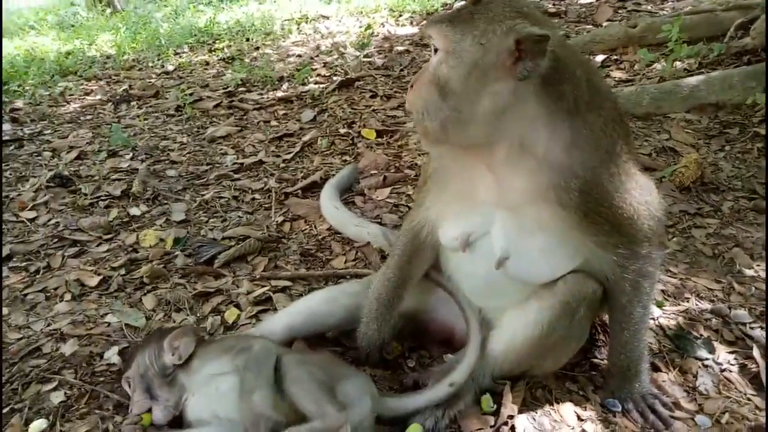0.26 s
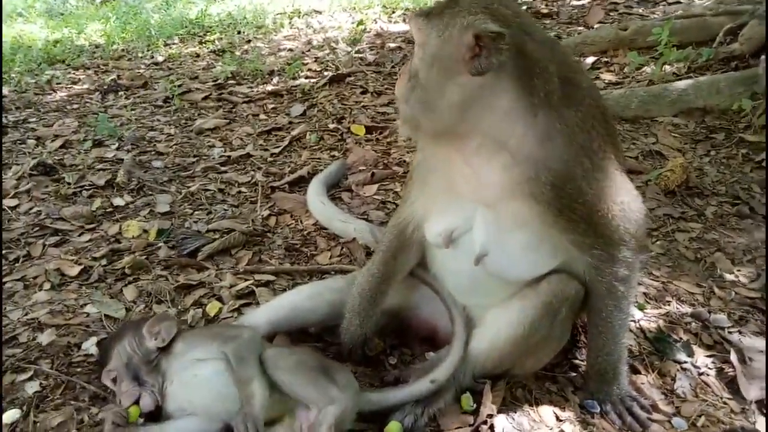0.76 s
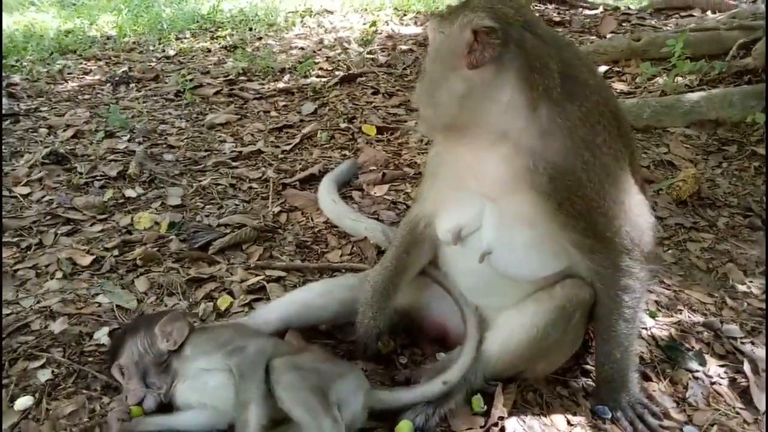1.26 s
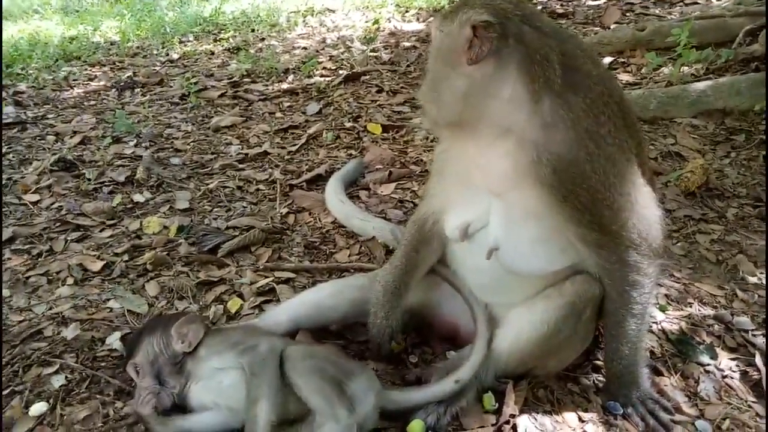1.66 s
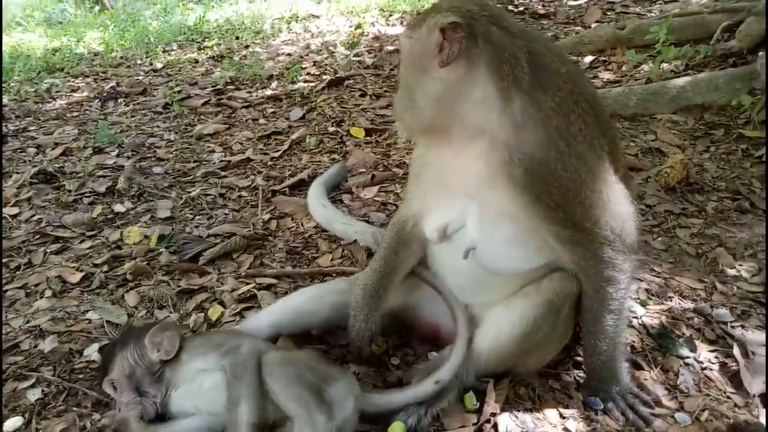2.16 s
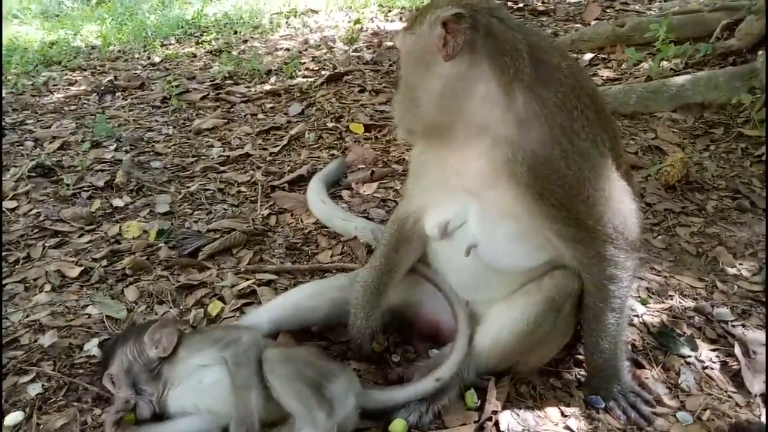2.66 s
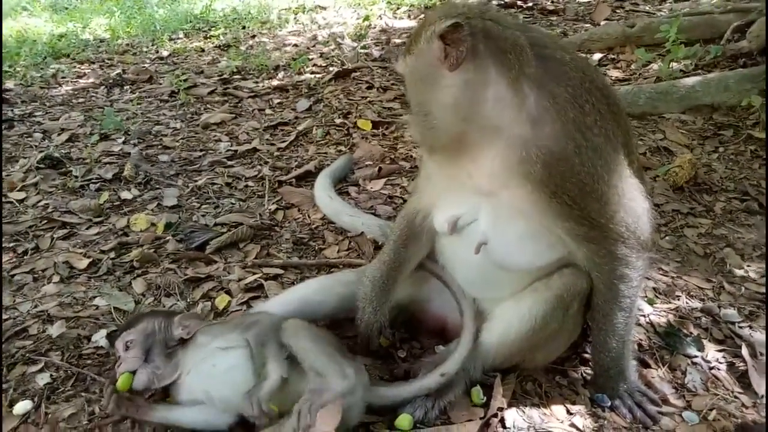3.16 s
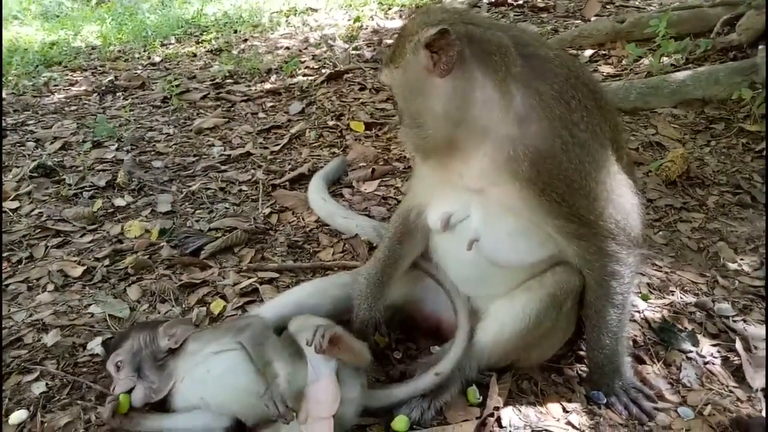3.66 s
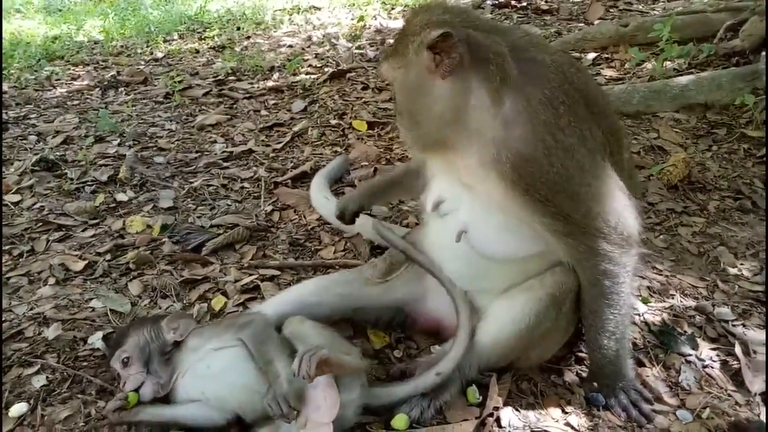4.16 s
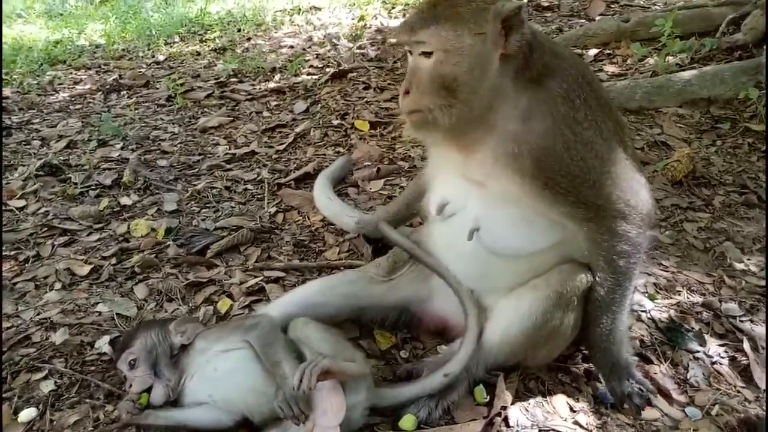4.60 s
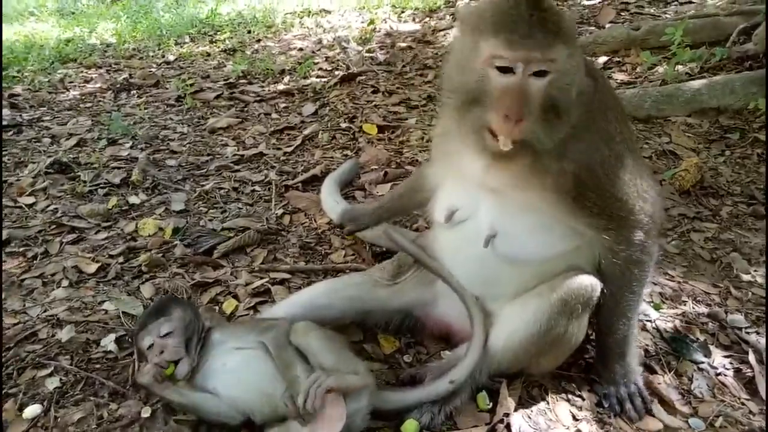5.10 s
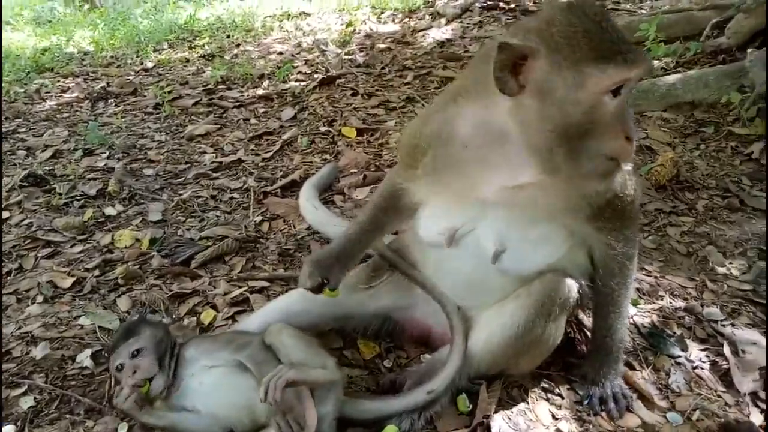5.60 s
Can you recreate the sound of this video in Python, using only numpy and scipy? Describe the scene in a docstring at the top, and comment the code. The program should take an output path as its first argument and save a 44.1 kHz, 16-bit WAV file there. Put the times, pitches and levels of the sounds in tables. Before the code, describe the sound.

A far two-note whistled animal call repeats three times in woodland while monkeys snap fruit and rustle dry leaves over low engine chugging and cicadas.

```python
"""A far animal gives a two-note whistled call that rings on among the trunks: near sines, blurred by breath, with
tails of fading noise. Monkeys are on dry leaf litter under trees: fruit and twigs snap as bursts that set off short
rings, and leaves rustle and scuff close by as noise and random grains. Two small engines run to the left, made of
coloured puffs, one pulling away. Cicadas drone as bands of noise, with a cricket band and one thin falling note."""
import sys
import numpy as np
from scipy import signal
from scipy.fft import rfft, irfft, next_fast_len
from scipy.io import wavfile

SR = 44100
rng = np.random.default_rng(int(sys.argv[2]) if len(sys.argv) > 2 else 0)


def output_pcm(signal):
    """Save a mono or channel-first signal as 16-bit PCM at the path in sys.argv[1].

    Samples are clipped to [-1, 1] before scaling.
    """
    pcm = np.clip(np.atleast_2d(signal).T, -1, 1) * 32767
    wavfile.write(sys.argv[1], SR, np.round(pcm).astype(np.int16))


N = 257544   # length in samples


def amp(db):
    """Turn decibels into a gain."""
    return 10 ** (np.asarray(db) / 20)


def rms_one(x):
    """Scale to an rms (average strength) of 1."""
    return x / np.sqrt(np.mean(x ** 2) + 1e-20)


def peak_one(x):
    """Scale so that the highest peak is 1."""
    return x / np.abs(x).max()


def in_time(rows):
    """Join the rows of a table with straight lines: one curve per column, one value per sample."""
    seconds, *columns = np.transpose(rows)
    return [np.interp(np.arange(N) / SR, seconds, column) for column in columns]


def colour(x, spectrum):
    """Filter x by a curve of (Hz, dB) points, with minimum phase so that a pulse rings after itself; rms 1."""
    hz, db = np.transpose(spectrum)
    size = 2 * next_fast_len(N // 2 + 4096)
    axis_hz = np.maximum(np.arange(size // 2 + 1) * SR / size, 1)
    gain = amp(np.interp(np.log(axis_hz), np.log(hz), db))
    # folding the cepstrum (the spectrum of the log gain) gives the minimum phase
    cepstrum = irfft(np.log(gain), size)
    cepstrum[1:size // 2] *= 2
    cepstrum[size // 2 + 1:] = 0
    filtered = irfft(rfft(x, size) * np.exp(rfft(cepstrum)), size)
    return rms_one(filtered[..., :N])


def drift(rate):
    """Slow random wandering of spread 1; a higher rate in Hz wanders faster."""
    step = 40   # worked out once every 40 samples, then joined by lines
    r = np.exp(-2 * step * np.pi * rate / SR)
    white = rng.standard_normal(N // step + 2002)
    slow = signal.lfilter([1], [1, -2 * r, r * r], white)[2000:]   # skip the settling
    return np.interp(np.arange(N) / step, np.arange(len(slow)), rms_one(slow))


def resonance(x, hz, width):
    """Let x ring round one pitch: a two-pole peak with gain 1 on top, width in Hz."""
    r = np.exp(-np.pi * width / SR)
    feed = np.array([1, 0, -1]) * (1 - r * r) / 2
    return signal.lfilter(feed, [1, -2 * r * np.cos(2 * np.pi * hz / SR), r * r], x)


def band(x, hz, width):
    """Apply a resonance three times for steep skirts; rms 1."""
    for _ in range(3):
        x = resonance(x, hz, width)
    return rms_one(x)


def swell(start, length, attack, release_db_per_s):
    """Loudness shape: a straight rise, a hold to the end of length, then a steady fall in dB."""
    t = np.arange(N) / SR - start
    return np.clip(t / attack, 0, 1) * amp(-release_db_per_s * np.maximum(t - length, 0))


def place(x, left_db, lag_s):
    """Make the left louder by left_db and later by lag_s; the mean gain of both sides is 1."""
    late = np.interp(np.arange(N) - lag_s * SR, np.arange(N), x)
    gains = amp([[left_db / 2], [-left_db / 2]])
    return np.array([late, x]) * gains / gains.mean()


def trees(x, t60):
    """Scatter from many trunks: a noise tail that falls 60 dB in t60 seconds, different on each side."""
    t = np.arange(int(1.5 * SR)) / SR
    tail = rng.standard_normal((2, len(t))) * amp(-60 * t / t60)
    tail /= np.sqrt(np.sum(tail ** 2, axis=1, keepdims=True))
    return signal.fftconvolve(np.atleast_2d(x), tail, axes=1)[:, :N]


def whistle(hz, level, breath, breath_hz):
    """A near sine following pitch and level; breath blurs it into a narrow band."""
    sine = np.sin(2 * np.pi * np.cumsum(hz) / SR)
    return level * (1 + breath * drift(breath_hz)) * np.sqrt(2) * sine


def firings(per_s, uneven_db):
    """One puff per engine firing, each of its own strength, and the swell of turbulence that follows it."""
    speed = per_s * (1 + .012 * drift(2.5))   # the speed wanders by about 1.2 %
    turns = np.cumsum(speed) / SR + .3
    fired = np.diff(np.floor(turns), prepend=0) > 0
    puffs = rms_one(fired * amp(uneven_db * rng.standard_normal(N)))
    gust = amp(0.15 * np.cos(2 * np.pi * turns))
    return puffs, gust


def engine(uneven_db, rumble_db, spread_db):
    """Two small engines to the left: one idles, the other stands under load and then speeds away."""
    # The idling engine. Each row: time in seconds, level in dB, level of the deepest notes in dB.
    idle_levels = [(0.0, -49.5, -55.5), (0.24, -54.5, -65), (0.55, -44.5, -54), (1.06, -46, -58.5),
                   (2.2, -46.5, -60), (3.4, -43, -51), (4.0, -41.5, -53), (5.2, -42.5, -57.5),
                   (5.84, -48, -50.5)]
    # Its speed. Each row: time in seconds, firings per second.
    idle_speed = [(0, 22.0), (1.0, 22.0), (2.4, 21.6), (5.84, 21.3)]
    # The departing engine. Each row: time in seconds, level of its body in dB, level of its upper notes in dB.
    departing_levels = [(0, -52.5, -61), (1.75, -68.5, -61), (2.2, -53.5, -52.5), (3.3, -68.5, -51),
                        (4.1, -61.5, -49.5), (5.1, -53, -47.5), (5.84, -45, -49)]
    # Tone of the idling exhaust: main notes, deepest notes, sharp edge of each puff. Each row: pitch in Hz, dB.
    idle_notes = [(70, -39.5), (100, 3), (125, 6), (155, 1.5), (185, -18.5), (260, -27), (500, -71),
                  (1500, -120)]
    deep_notes = [(12, -14.5), (45, -17.5), (65, -13), (88, -2), (105, -15.5), (140, -67), (300, -120)]
    tick_notes = [(150, -38), (280, -4.5), (500, -6), (800, -11), (1500, -62)]
    # Tone of the departing exhaust: body, upper notes, notes that brighten. Each row: pitch in Hz, dB.
    body_notes = [(80, -38.5), (110, -8), (140, -5.5), (170, -8.5), (200, -20), (280, -38.5), (1000, -120)]
    loaded_notes = [(120, -29.5), (190, 5.5), (230, 4.5), (300, -10), (400, -19.5), (600, -28.5),
                    (1000, -67.5), (2000, -120)]
    bright_notes = [(200, -55), (260, -1), (300, 3.5), (340, -9), (420, -23.5), (700, -33), (2000, -120)]

    idle_db, deep_db = in_time(idle_levels)
    body_db, upper_db = in_time(departing_levels)
    # 18 firings per second under load; from 4 s on it gains 5.9 per second, every second
    gained = 5.9 * np.maximum(np.arange(N) / SR - 4.0, 0)
    idle, idle_gust = firings(in_time(idle_speed)[0], uneven_db)
    away, away_gust = firings(18 + gained, uneven_db)
    bright_db = upper_db - 15.5 + 1.38 * gained   # the note brightens with speed
    tick_db = idle_db - 28
    noise = rng.standard_normal((4, N))

    # each part: tone, level in dB, puffs mixed with gusty noise
    low_parts = [(idle_notes, idle_db, idle + amp(rumble_db) * idle_gust * noise[0]),
                 (deep_notes, deep_db, idle + amp(4.5) * idle_gust * noise[1]),
                 (tick_notes, tick_db, idle * amp(4.5 * noise[0])),   # ticks of uneven strength
                 (body_notes, body_db, away + amp(rumble_db) * away_gust * noise[1])]
    upper_parts = [(loaded_notes, upper_db, away + amp(3.5) * away_gust * noise[0]),
                   (bright_notes, bright_db, away + amp(-5.0) * away_gust * noise[1])]
    low = sum(amp(db) * colour(puffs, notes) for notes, db, puffs in low_parts)
    upper = sum(amp(db) * colour(puffs, notes) for notes, db, puffs in upper_parts)
    scattered = sum(amp(db) * colour(noise[2:], notes) for notes, db, _ in low_parts + upper_parts)
    # the upper notes reach both sides closer together
    direct = place(low, left_db=7.5, lag_s=.00045) + place(upper, left_db=7.5, lag_s=.00027)
    return direct + amp(spread_db) * scattered


STIR_LAG_S = .00047   # how much later stir and scuffs reach the left side


def leaves():
    """A dull stir of foliage in narrow patches that come and go, and crisp dense grains when a limb drags."""
    # Foliage stirred. Each row: time in seconds, low stir in dB, high stir in dB, both before the left-right tilt.
    stirring = [(0.0, -69, -62), (0.3, -69, -71), (0.55, -67, -63), (0.7, -73, -78.5), (1.0, -80.5, -80),
                (1.8, -74, -75.5), (2.13, -62.5, -62), (2.7, -67.5, -72), (3.33, -66.5, -69),
                (3.5, -60.5, -66), (4.1, -65, -68.5), (4.5, -67, -76.5), (4.99, -68, -66.5),
                (5.45, -68.5, -66.5), (5.84, -67, -63.5)]
    # A limb drags over dry leaves. Each row: start in seconds, length in seconds, level of the crackle in dB.
    drags = [(0.352, 0.13, -76), (0.489, 0.085, -62), (3.502, 0.041, -69.5), (3.534, 0.016, -66.5),
             (3.765, 0.025, -62.5), (3.832, 0.011, -65.5), (4.073, 0.034, -72), (4.58, 0.035, -72.5),
             (5.74, 0.017, -73)]
    # Tone of the low stir, the high stir and the crackle. Each row: pitch in Hz, strength in dB per Hz.
    low_tone = [(500, -26), (800, -8), (1150, -9), (1350, -1), (1500, -3.5), (1700, -1.5), (1950, -12),
                (2600, -48)]
    high_tone = [(1400, -44), (1900, -5), (2700, 1.5), (4400, -6), (6000, -11.5), (7200, -45.5),
                 (9000, -87.5)]
    crackle_tone = [(1760, -68.5), (3000, -14), (4580, -27), (5740, -11.5), (7100, -17), (8140, -28),
                    (13200, -28.5), (15400, -40)]

    low_db, high_db = in_time(stirring)
    crackle = sum(amp(db) * swell(s, length, attack=.0041, release_db_per_s=347) for s, length, db in drags)
    shared = .6   # share of the stir's power that comes from one place on the left
    white = np.sqrt(1 - shared) * rng.standard_normal((2, N))
    white = white + np.sqrt(shared) * place(rng.standard_normal(N), 0, STIR_LAG_S)

    born = rng.random((2, N)) < 5000 / SR   # about 5000 grains per second
    strength = amp(3.6 * np.minimum(rng.exponential(1, (2, N)), 4))
    grains = born * strength * rng.choice([-1, 1], (2, N))

    patches = 0
    for hz in np.geomspace(750, 6500, 30):
        patches = patches + resonance(white, hz, .06 * hz) * amp(2.8 * drift(5)) / np.sqrt(hz)
    low = amp(low_db) * colour(patches, low_tone)
    high = amp(high_db) * colour(rms_one(patches) + 0.47 * rms_one(grains), high_tone)
    return (low + high) * amp([[3.5], [-3.5]]) + crackle * colour(grains, crackle_tone)


def insects():
    """A far cicada chorus in broad bands that swell on their own, a faint cricket band and one thin falling note."""
    # Cicada bands. Each row: centre in Hz, width in Hz, level against the other bands in dB.
    cicadas = [(3320, 645, 1), (3840, 520, -0.5), (4516, 1330, 1.5)]
    # Loudness of the whole chorus. Each row: time in seconds, level in dB.
    chorus_levels = [(0.0, -60.5), (0.42, -56), (0.63, -59.5), (1.1, -63), (2.2, -61), (3.6, -56.5),
                     (4.1, -60), (4.85, -57.5), (5.3, -62.5), (5.84, -57)]
    # The thin note, one row: start in seconds, length in seconds, level in dB before breath unsettles it,
    # start pitch in Hz, end pitch in Hz, settling time in seconds.
    thin_note = (3.23, .38, -83, 7550, 6620, .12)

    white = rng.standard_normal((2, N))
    bands = sum(amp(db + 1.6 * drift(3)) * band(white, hz, width) for hz, width, db in cicadas)
    tilt_db = np.array([[-.5], [.5]])   # the right is 1 dB louder
    chorus = amp(in_time(chorus_levels)[0] + tilt_db) * rms_one(bands)
    cricket = amp(-93 + 3.5 * drift(6)) * band(white, hz=7650, width=300)

    s, length, db, start_hz, end_hz, settle = thin_note
    since = np.maximum(np.arange(N) / SR - s, 0)
    hz = end_hz + (start_hz - end_hz) * np.exp(-since / settle)
    level = amp(db) * swell(s, length, attack=0.097, release_db_per_s=200)
    thin = whistle(hz, level, breath=3.4, breath_hz=220)
    return chorus + cricket + trees(thin, t60=0.24)


def air():
    """The steady air of the wood: coloured noise, different on each side and 3 dB louder on the left."""
    # Tone of the air. Each row: pitch in Hz, strength in dB per Hz.
    air_tone = [(180, -14.5), (300, 8), (1180, -8), (2280, -25), (2890, -26.5), (3330, -5), (4110, -3),
                (4790, 2), (6430, -47), (7820, -53), (8500, -48.5), (11000, -73), (18700, -120)]
    return amp(-67) * colour(rng.standard_normal((2, N)), air_tone) * amp([[1.5], [-1.5]])


def snaps():
    """Each snap is a tearing burst of 1 ms: a treble tick, two short rings and a lower hollow ring that lasts."""
    # Snaps of fruit and twigs. Each row: time in seconds, low ring in dB, low ring in Hz, middle ring in dB,
    # middle ring in Hz, high ring in Hz, high ring in dB, treble tick in dB, time in seconds for the low
    # resonance to fall 60 dB, left louder than right in dB. The ring and tick levels are peaks before the sides are set.
    snap_table = [(0.0136, -40.5, 1870, -39, 2270, 2950, -28, -59, 0.018, 6.5),
                  (0.195, -80, 1520, -60, 2900, 3300, -49, -78, 0.034, -6),
                  (1.4184, -51, 1660, -51, 3520, 3950, -45, -81, 0.045, 9),
                  (2.033, -39, 2010, -41, 3310, 3930, -37.5, -60, 0.0099, 2),
                  (2.036, -36.5, 1640, -28.5, 2700, 3010, -33.5, -60, 0.036, 12),
                  (2.1, -53, 1510, -52, 5100, 4500, -47.5, -67, 0.02, -9),
                  (3.021, -45.5, 1880, -41.5, 2460, 3980, -48, -65, 0.012, 10.5),
                  (3.0302, -53, 1590, -46, 2480, 4400, -47, -67, 0.015, -2),
                  (3.1341, -60, 2110, -30, 3950, 4700, -41.5, -69, 0.01, 5.5),
                  (3.4394, -62, 1450, -51, 3020, 3700, -38.5, -83, 0.027, 10),
                  (3.7751, -77, 1830, -62, 5020, 4000, -48.5, -60, 0.043, 14),
                  (3.8398, -78, 1590, -64, 5000, 3300, -50, -62, 0.025, 8),
                  (3.982, -75, 1650, -56, 5430, 3580, -45, -81, 0.02, 8.5),
                  (3.9935, -74, 2480, -46, 3230, 5160, -54, -82, 0.01, 2),
                  (3.9964, -44, 2110, -58, 3210, 4330, -50, -77, 0.013, 3),
                  (4.022, -69, 1900, -56, 3600, 4300, -48, -85, 0.01, -1),
                  (4.0298, -53, 2050, -70, 3000, 4550, -55, -85, 0.012, 4),
                  (4.043, -58, 1800, -46, 4330, 3570, -54, -83, 0.01, -6),
                  (4.078, -72, 1490, -62.5, 6400, 5370, -63, -82, 0.013, -9),
                  (4.9915, -63.5, 2020, -66, 3300, 4340, -45, -87.5, 0.04, 4)]
    out = np.zeros((2, N))
    t = np.arange(4410) / SR
    bursts = rng.standard_normal((len(snap_table), len(t))) * t ** 2 * np.exp(-t / .0002)
    for burst, row in zip(bursts, snap_table):
        s, low_db, low_hz, mid_db, mid_hz, high_hz, high_db, tick_db, t60, left_db = row
        low = resonance(band(burst, low_hz, 600), low_hz, np.log(1000) / np.pi / t60)
        mid = resonance(band(burst, mid_hz, 900), mid_hz, 450)
        high = resonance(band(burst, high_hz, 900), high_hz, 450)
        tick = band(burst, 9500, 9000)
        layers = ((low_db, low), (mid_db, mid), (high_db, high), (tick_db, tick))
        ring = sum(amp(db) * peak_one(x) for db, x in layers)
        at = round((s - .0005) * SR)   # start early, as the burst takes a moment to build
        out[:, at:at + len(t)] += ring * amp([[left_db / 2], [-left_db / 2]])
    return out + amp(-9.5) * trees(out, t60=.22)   # the trunks return some of each snap


def scuffs():
    """Each scuff is its own run of coarse grains on the left, setting curled leaves ringing at one pitch."""
    # A hand scuffs in the litter. Each row: start in seconds, length in seconds, level in dB,
    # ring of the curled leaves in Hz, level of that ring in dB.
    scuff_table = [(0.216, 0.055, -68, 4440, -63), (0.24, 0.069, -69, 2660, -66),
                   (0.359, 0.037, -58, 1860, -62), (0.353, 0.067, -62, 4500, -57),
                   (0.377, 0.06, -60, 2630, -61), (0.45, 0.02, -64, 3500, -63),
                   (0.5, 0.096, -60.5, 3050, -63)]
    # Tone of the grains. Each row: pitch in Hz, strength in dB per Hz.
    scuff_tone = [(1400, -21), (1900, -17), (2700, 1), (3500, -14), (4500, -4), (5600, -11.5), (7200, -33),
                  (9000, -93)]
    near = 0
    for s, length, db, hz, ring_db in scuff_table:
        born = rng.random(N) < 700 * amp(2.5 * drift(90)) / SR   # around 700 grains per second, in clumps
        strength = amp(4.5 * np.minimum(rng.exponential(1, N), 2.5))
        grains = born * strength * rng.choice([-1, 1], N)
        ring = rms_one(resonance(resonance(grains, hz, 500), hz, 500))
        shape = swell(s, length, attack=.015, release_db_per_s=500)
        near = near + shape * (amp(db) * colour(grains, scuff_tone) + amp(ring_db) * ring)
    return place(near, 5.0, STIR_LAG_S) + amp(-4) * trees(near, t60=.05)


def far_calls():
    """The notes arrive from the left, ring among the near swaying trees and die slowly in the far wood."""
    # Two-note calls. Each row: start of the low note in seconds, its level in dB, its swell in seconds,
    # start of the high note in seconds, its level in dB, time its pitch falls in seconds, pitch it settles on in Hz,
    # its length in seconds, its fading in dB per second, its late echo in dB against the note.
    # The levels are those before breath, echoes and the placing to the left.
    calls = [(0.528, -58.5, .008, 0.711, -43, .06, 930, .105, 15, -21),
             (1.885, -58.5, .06, 2.092, -40.5, .065, 938, .12, 110, -24),
             (3.362, -57.5, .05, 3.585, -43, .052, 929, .12, 25, -17.5)]
    low_length, release = .08, 698.5   # seconds, dB per second
    high_start_hz = 1073.6   # the high note drops from here to its pitch, then holds
    breath, breath_hz = .28, 45   # how far and how fast breath unsettles a note
    held_hz = 935   # pitch round which most sound returns

    t = np.arange(N) / SR
    notes, late = 0, 0
    for low_s, low_db, low_swell, high_s, high_db, fall, settled_hz, length, fade, echo_db in calls:
        low_hz = 797 + 30 * np.clip((t - low_s) / low_length, 0, 1)   # the low note creeps up
        low = amp(low_db) * swell(low_s, low_length, low_swell, release)
        still_to_fall = np.clip(1 - (t - high_s) / fall, 0, 1)
        high_hz = settled_hz + (high_start_hz - settled_hz) * still_to_fall
        fading_db = high_db - fade * np.clip(t - high_s, 0, length)
        high = amp(fading_db) * swell(high_s, length, 0.016, release)
        high_note = whistle(high_hz, high, breath, breath_hz)
        notes = notes + whistle(low_hz, low, breath, breath_hz) + high_note
        late = late + amp(echo_db) * high_note

    near_tail = amp(-11) * trees(notes, t60=0.35)
    far_tail = amp(-16.5) * trees(notes, t60=1.3)
    # a late echo from the edge of the wood, after .305 s; mostly the held pitch returns
    edge_echo = np.interp(t - .305, t, resonance(late, held_hz, 60))
    # a stand of trees returns an even smear from .06 to .165 s later, richest round the held pitch
    stand = rng.standard_normal((2, round(.165 * SR)))
    stand[:, :round(.06 * SR)] = 0
    stand = stand / np.sqrt(np.sum(stand ** 2, axis=1, keepdims=True))
    smear = signal.fftconvolve([resonance(notes, held_hz, 220)], stand, axes=1)[:, :N]
    echo = edge_echo + amp(-8.5) * smear

    sway = 1 + .45 * np.array([drift(70), drift(70)])   # moving air and leaves blur the tails
    doubled = notes + amp(-9) * np.interp(t - .04, t, notes)   # an early reflection doubles each note
    around = (near_tail + far_tail + echo) * amp([[3], [-3]]) * sway
    return place(doubled, left_db=7.6, lag_s=.00005) + around


def blurred_calls():
    """Faint calls farther off, blurred to bands: noise through two equal resonances, different on each side."""
    # Each row: start in seconds, length in seconds, level in dB, centre in Hz.
    faint_calls = [(0.821, 0.13, -70, 1770), (1.9, 0.18, -66, 1397), (2.266, 0.47, -69, 1360),
                   (2.298, .34, -67.5, 1030), (3.316, 0.3, -70.5, 1360), (4.394, 0.238, -62, 939),
                   (5.103, 0.55, -68, 1778), (5.24, 0.25, -69.5, 1344)]
    white = rng.standard_normal((2, N))
    out = 0
    for s, length, db, hz in faint_calls:
        blur = rms_one(resonance(resonance(white, hz, 140.0), hz, 140.0))
        out = out + amp(db) * swell(s, length, attack=0.034, release_db_per_s=400) * blur
    return out


def scene():
    """All sources over the steady air of the wood."""
    engines = engine(uneven_db=2.5, rumble_db=-4.5, spread_db=-13)
    close_by = leaves() + snaps() + scuffs()
    return engines + close_by + insects() + air() + far_calls() + blurred_calls()


def record(dry):
    """The microphone adds a faint treble hiss; the top is cut, 60 dB down from 15500 Hz upward."""
    treble = signal.butter(6, 8000, "high", fs=SR, output="sos")
    hiss = signal.sosfilt(treble, rng.standard_normal((2, N)))
    top_cut = signal.cheby2(20, 60, 15500, fs=SR, output="sos")
    return signal.sosfilt(top_cut, dry + amp(-86) * hiss)


dry = scene()
out = record(dry)
output_pcm(out)
```